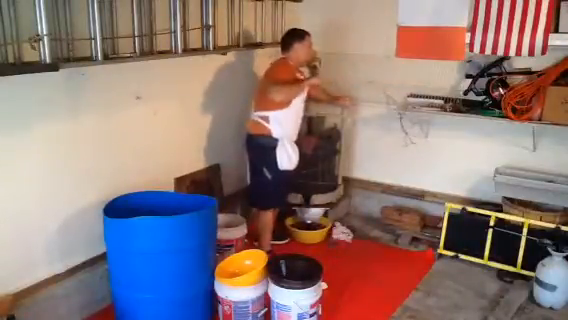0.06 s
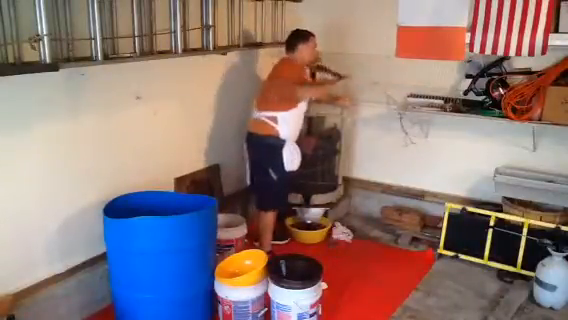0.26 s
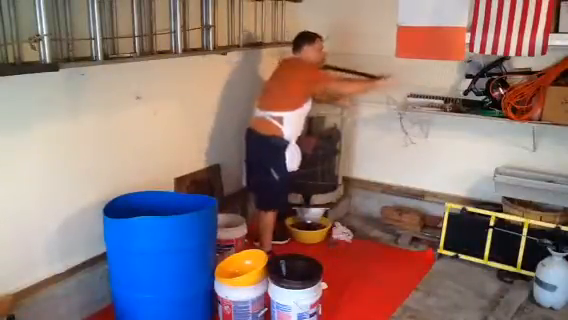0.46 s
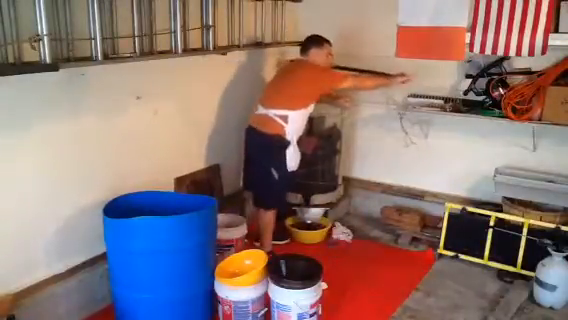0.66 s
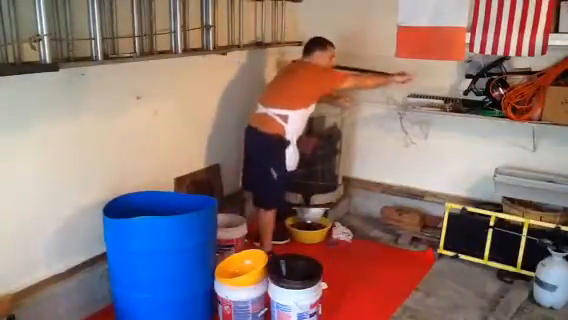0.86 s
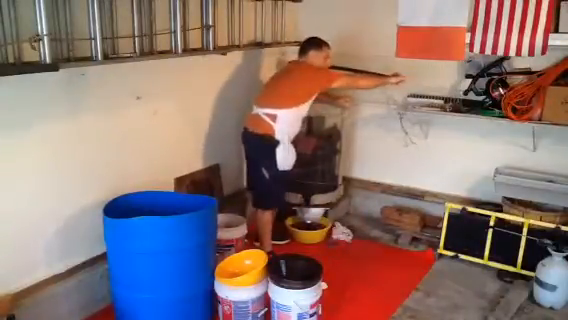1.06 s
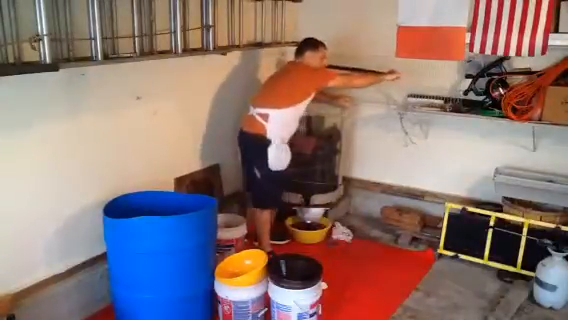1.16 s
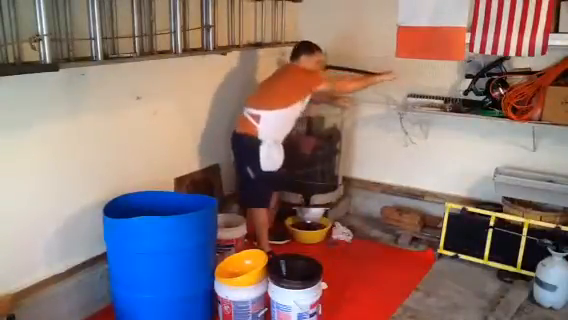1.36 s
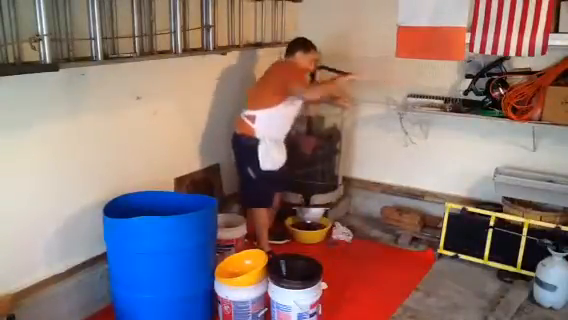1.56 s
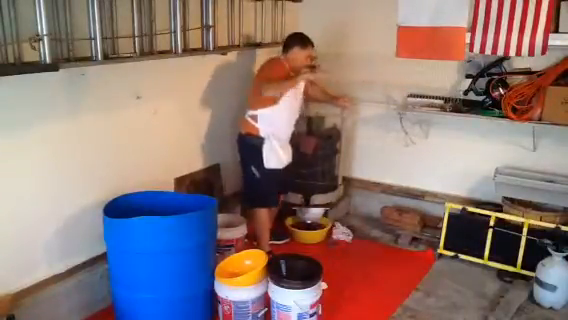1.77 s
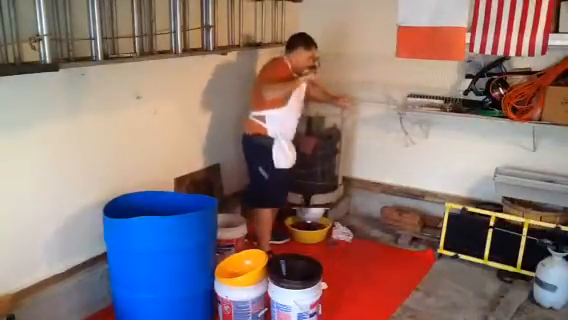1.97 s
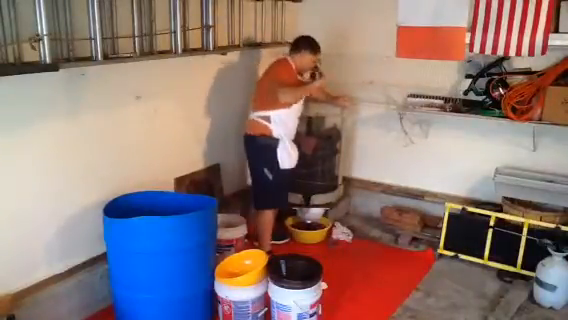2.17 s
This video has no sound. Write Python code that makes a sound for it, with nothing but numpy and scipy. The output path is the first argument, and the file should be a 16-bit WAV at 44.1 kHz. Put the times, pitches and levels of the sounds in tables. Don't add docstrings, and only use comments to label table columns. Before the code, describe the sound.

Hand-worked ratchet press: two bright metallic pawl clacks echo in a hard-walled garage, with faint knocks

```python
import sys
import numpy as np
from scipy import signal
from scipy.fft import rfft, irfft
from scipy.io import wavfile
from scipy.ndimage import uniform_filter1d

SR = 44100
rng = np.random.default_rng(int(sys.argv[2]) if len(sys.argv) > 2 else 0)


def voltage_ratio(level):
    return 10 ** (np.asarray(level, float) / 20)


def transcribe(u):
    v = np.clip(np.atleast_2d(u).T, -1, 1)
    q = np.round(v * 32767).astype(np.int16)
    wavfile.write(sys.argv[1], SR, q)


N = 97020

# (time [s], level [dB])
CLACKS = [
    (0.4174, -15),
    (0.6443, -13),
]
TOOTH_A_HZ = [900, 1040, 1077, 1120, 1151, 1296, 1814, 2653, 2721, 2921, 3027, 3308, 3523, 4368]
TOOTH_B_HZ = [937, 1042, 1123, 1301, 1689, 1770, 2643, 2921, 3006, 3082, 3174, 3256, 3312, 4760]
# (level [dB], t60 [s])
TOOTH_A_MODES = [(-4.5, 0.17), (5, .15), (6, 0.18), (6, 0.12), (1, 0.29), (-4, 0.22), (3, 0.12),
                 (5.5, 0.19), (2, 0.25), (0, 0.19), (6.5, 0.14), (1, 0.13), (-12, 0.12), (1, 0.096)]
TOOTH_B_MODES = [(2.5, 0.32), (3.5, 0.15), (7, 0.17), (-4, 0.18), (5, 0.18), (13.5, 0.18), (5.5, .14),
                 (-1, 0.17), (-9, .14), (-4, 0.2), (12, .15), (-5, .14), (-7, 0.28), (0, .12)]
# (frequency [Hz], density [dB per Hz])
CRACK_A = [(400, -22.5), (800, -13), (1080, -3), (2100, -12.5), (2950, -4), (5800, -12.5), (7200, -10),
           (15500, -29.5)]
CRACK_B = [(400, -22), (850, -15), (1400, -9), (1770, -7), (2250, -10.5), (2900, -3.5), (8990, -16),
           (15500, -30)]
# (delay [s], level [dB])
CHATTER = [(.0003, -22), (.0009, -19), (.0016, 4.5), (.0026, -9)]
# (time [s], level [dB])
TICK = [
    (1.7721, -34.5),
]
# (pitch [Hz], level [dB], t60 [s])
TICK_MODES = [(2456, 12, 0.049), (3370, 4, 0.034), (4060, -5, 0.015), (4870, -3, 0.025)]
# (frequency [Hz], density [dB per Hz])
TICK_CRACK = [(500, -19), (1500, -8), (2450, -4.5), (3000, -2.5), (4200, -1), (5200, -4.5), (6200, -10.5),
              (15500, -12.5)]
CRACK_A_DB, CRACK_B_DB, RATTLE_DB, RING_DB = 12.5, 12, 5.5, 2.5
RATTLE_DECAY_S, SLIP_S = 0.0047, 0.002

# (time [s], socket [dB], treble tilt [dB per octave], frame [dB])
JUDDERS = [
    [(.091, -46, -2, -49), (.099, -48.5, -9, -44), (.107, -48, -7, -54), (.115, -51, -7, -38),
     (.128, -47.5, -9, -51), (.137, -48, -5, -49)],
    [(1.1455, -48.5, -8, -72), (1.153, -46, -12, -55), (1.164, -53, -8, -53), (1.174, -54, -15, -56),
     (1.185, -47.5, -13, -57)],
    [(2.1008, -41.5, 4, -65), (2.104, -41.5, 4, -44), (2.110, -39, 2, -60), (2.118, -47, 9, -45.5),
     (2.126, -47, 0, -36), (2.136, -48, 3, -48), (2.142, -43, 7, -55), (2.148, -43, -5, -38),
     (2.153, -48, -3, -61)],
]
JUDDER_SCUFF_DB = (-54, -63.5, -53.5)
# (pitch [Hz], level [dB], t60 [s])
SOCKET_MODES = [(869, -15, 0.024), (1000, 3, 0.039), (1085, 1, 0.064), (1330, -12, 0.046),
                (1780, -6, 0.049), (2883, -0.5, 0.022), (3780, -11, 0.025)]
FRAME_MODES = [(163, -2, 0.064), (198, 6, 0.036), (276, -2, 0.025), (503, -0.5, 0.041)]
# (frequency [Hz], density [dB per Hz])
SCUFF = [(250, 4), (1000, 3), (1400, 2), (2500, -2), (4500, -10), (8000, -59), (15000, -33.5)]

# (time [s], level [dB])
THUMP = [
    (0.2087, -23),
]
# (pitch [Hz], level [dB], t60 [s])
BASKET_MODES = [(72, -5.5, 0.21), (100, -4, 0.17), (211, -10, 0.18), (279.3, -1, 0.15), (325.3, -6, 0.28),
                (363, 4.5, 0.089), (443, -6, 0.15), (505, -2.5, 0.12), (630, -11.5, 0.13),
                (730, -15.5, 0.13)]
THUMP_RISE_S = 0.0079

# (start [s], length [s], pitch [Hz], level [dB])
CREAKS = [(.155, 0.0513, 1470, -58), (0.315, 0.0576, 1590, -61.5), (.99, 0.0228, 2521, -63),
          (1.079, 0.018, 1780, -59), (1.086, 0.037, 3088, -62), (1.33, 0.1, 935, -57.5),
          (1.349, 0.027, 2630, -57.5), (1.417, .045, 3630, -60), (1.456, 0.0464, 1000, -64.5),
          (1.626, 0.059, 862, -54), (1.667, 0.036, 3034, -64), (1.7, 0.063, 910, -61),
          (1.788, 0.1326, 920, -61), (1.957, 0.0852, 945, -64.5), (1.8, 0.48, 1470, -70),
          (0.247, 0.0531, 1283, -57), (1.156, 0.041, 513, -54), (1.191, .07, 647, -63),
          (1.22, 0.0515, 524, -65), (0.573, 0.036, 330, -53.5), (0.339, 0.112, 697, -66)]
CREAK_WIDTH_HZ, CREAK_SLIPS_PER_S = 95, 400
# (start [s], length [s], level [dB])
SLIDES = [
    (0.304, 0.4, -59.5),
    (1.119, 0.31, -60),
    (1.5, 0.121, -72),
]
# (frequency [Hz], density [dB per Hz])
RUB = [(250, -1.5), (500, -21), (1500, -11.5), (4000, -12), (9000, -18), (15000, -26)]

# (frequency [Hz], t60 [s])
GARAGE_T60 = [(100, 0.87), (400, 0.71), (1000, 0.36), (3000, 0.33), (8000, 0.31), (14000, 0.21)]
# (delay [s], level [dB])
WALLS = [(.0029, 3), (.0053, -6), (.0075, 0.5), (0.0085, 1.5), (0.0122, -0.5), (0.016, -3.5), (0.023, -3)]
FIRST_ECHO_S, BUILD_S = 0.0023, 0.021
CRACK_WET_DB, TICK_WET_DB, RING_WET_DB = 17.5, 10, -4.5
JUDDER_WET_DB, THUMP_WET_DB, CREAK_WET_DB = -6.5, -13, -4
# (frequency [Hz], density [dB per Hz])
TONE = [(18, -58), (30, -30), (120, 3), (790, -10.5), (949, -8), (1870, -10.5), (2190, -13), (2500, -11.5),
        (15600, -25)]
TONE_DB = -56.5
# (pitch [Hz], width [Hz], level [dB])
ROOM_HUMS = [(141.4, 120, -86), (330, 21, -71.5)]

MIC_LIMIT, LOW_CUT_HZ, EDGE_HZ, PREAMP_DB = 0.24, 143, 15450, -70.5


def pawl(db, modes, crack, crack_db, rattle_db, slip_s, spread, wet_db, ring_db):
    bell = voltage_ratio(ring_db) * ring(modes)
    t = np.arange(len(bell)) / SR
    rise = np.minimum(t / slip_s, 1) ** 2
    rattle = voltage_ratio(rattle_db) * coloured(len(t), crack) * np.exp(-t / RATTLE_DECAY_S)
    touch = voltage_ratio(crack_db) * click(crack)
    snap = np.zeros(len(t))
    add(snap, slip_s, touch)
    chatter = np.zeros(len(t) + SR // 2 - 1)
    for k, (delay_s, touch_db) in enumerate(CHATTER):
        add(chatter[:len(t)], slip_s + spread * delay_s, (-1) ** k * voltage_ratio(touch_db) * touch)
    body = garage(rise * (bell + rattle), RING_WET_DB)
    return voltage_ratio(db) * (garage(snap, wet_db) + body + chatter)


def judder(blows, scuff_db):
    out = np.zeros(SR // 2)
    t = np.arange(len(out)) / SR
    frame = ring(FRAME_MODES)
    frame = frame * np.minimum(t[:len(frame)] / 0.0036, 1)
    bends = rng.uniform(0.92, 1.015, len(blows))
    for (s, db, treble_db, frame_db), bend in zip(blows, bends):
        socket = []
        for hz, mode_db, t60_s in SOCKET_MODES:
            tilt_db = treble_db * np.log2(max(hz / 1200, 1))
            socket.append((hz * bend, mode_db + tilt_db, t60_s))
        add(out, s - blows[0][0], voltage_ratio(db) * ring(socket) + voltage_ratio(frame_db) * frame)
    scuff = coloured(len(out), SCUFF) * np.exp(-(t / 0.045) ** 2)
    return garage(out + voltage_ratio(scuff_db) * scuff, JUDDER_WET_DB)


def thump(db):
    bell = ring(BASKET_MODES)
    rise = np.minimum(np.arange(len(bell)) / SR / THUMP_RISE_S, 1) ** 3
    return garage(voltage_ratio(db) * bell * rise, THUMP_WET_DB)


def creak(length_s, hz, db):
    shape = arch(length_s) ** 0.52
    slip_now = rng.random(SR // 2) < CREAK_SLIPS_PER_S / SR
    slips = rng.standard_normal(SR // 2) * (0.018 + slip_now)
    return voltage_ratio(db) * shape * resonate(slips[:len(shape)], hz, CREAK_WIDTH_HZ)


def slide(length_s, db):
    shape = arch(length_s)
    grit = voltage_ratio(0.82 * rng.exponential(1, SR // 2))
    rub = evened(coloured(SR // 2, RUB) * grit)
    return voltage_ratio(db) * shape * rub[:len(shape)]


def garage(x, wet_db):
    taps = np.zeros(SR // 2)
    at = np.arange(0, len(taps) - 20, 20)
    taps[at + rng.integers(0, 20, len(at))] = rng.choice([-1., 1.], len(at))
    hz, t, z = signal.stft(taps, SR, nperseg=256)
    t60_s = np.maximum(read(GARAGE_T60, hz), 0.05)[:, None]
    tail = signal.istft(z * voltage_ratio(-60 * t / t60_s), SR, nperseg=256)[1][:len(taps)]
    t = np.arange(len(tail)) / SR
    tail = tail * np.clip((t - FIRST_ECHO_S) / BUILD_S, 0, 1) ** 0.5
    tail = np.r_[1, voltage_ratio(wet_db) * tail[1:] / np.linalg.norm(tail)]
    places = rng.uniform(-1, 1, (len(WALLS), 2))
    for (delay_s, db), (shift, sign) in zip(WALLS, places):
        echo = np.sign(sign) * voltage_ratio(db + min(wet_db - 4.5, 0))
        tail[round((delay_s + 0.0004 * shift) * SR)] += echo
    return signal.fftconvolve(x, tail)


def room_tone():
    hz, t, z = signal.stft(coloured(N, TONE), SR, nperseg=1024, noverlap=768)
    patches = uniform_filter1d(rng.standard_normal(z.shape), 6, 0)
    patches = evened(uniform_filter1d(patches, 14, 1))
    depth_db = read([(200, 1.6), (1500, 0.23), (6000, 2.6)], hz)[:, None]
    hiss = signal.istft(z * voltage_ratio(depth_db * patches), SR, nperseg=1024, noverlap=768)[1][:N]
    out = voltage_ratio(TONE_DB) * evened(hiss)
    for hum_hz, width_hz, db in ROOM_HUMS:
        out = out + voltage_ratio(db) * resonate(rng.standard_normal(N), hum_hz, width_hz)
    return out


def ring(modes):
    t = np.arange(SR // 4) / SR
    out = np.zeros(len(t))
    for hz, db, t60_s in modes:
        out += voltage_ratio(db - 60 * t / max(t60_s, 0.005)) * np.sin(2 * np.pi * hz * t)
    return out / np.sqrt(sum(voltage_ratio(db) ** 2 for _, db, _ in modes))


def click(points):
    hz = abs(np.fft.fftfreq(2048, 1 / SR))
    skirt = np.clip(hz / points[0][0], 0.001, 1) ** 2
    log_gain = np.log(voltage_ratio(read(points, hz)) * skirt)
    out = np.fft.ifft(np.exp(np.conj(signal.hilbert(log_gain)))).real[:1024]
    return out / np.linalg.norm(out)


def coloured(count, points):
    hz = np.fft.rfftfreq(count, 1 / SR)
    skirt = np.minimum(hz / points[0][0], 1) ** 2
    spectrum = rfft(rng.standard_normal(count)) * voltage_ratio(read(points, hz)) * skirt
    return evened(irfft(spectrum, count))


def resonate(x, hz, width_hz):
    r = np.exp(-np.pi * width_hz / SR)
    return evened(signal.lfilter([1, 0, -1], [1, -2 * r * np.cos(2 * np.pi * hz / SR), r * r], x))


def arch(length_s):
    return np.sin(np.pi * np.arange(0, length_s, 1 / SR) / length_s)


def read(points, hz):
    f, value = np.transpose(points)
    return np.interp(np.log(hz + 1), np.log(f + 1), value)


def evened(x):
    return x / np.sqrt(np.mean(x ** 2) + 1e-20)


def add(mix, s, sound):
    part = mix[round(s * SR):][:len(sound)]
    part += sound[:len(part)]


def scene():
    mix, faint = room_tone(), np.zeros(N)
    teeth = [(TOOTH_A_HZ, TOOTH_A_MODES, CRACK_A, CRACK_A_DB),
             (TOOTH_B_HZ, TOOTH_B_MODES, CRACK_B, CRACK_B_DB)]
    for (s, db), (pitches, shares, crack, crack_db) in zip(CLACKS, teeth):
        modes = [(hz, *share) for hz, share in zip(pitches, shares)]
        add(mix, s, pawl(db - 12.5, modes, crack, crack_db, RATTLE_DB, SLIP_S, spread=1.1,
                         wet_db=CRACK_WET_DB, ring_db=RING_DB))
    for s, db in TICK:
        add(mix, s, pawl(db - 14, TICK_MODES, TICK_CRACK, crack_db=19.9, rattle_db=5.4, slip_s=0.0006,
                         spread=0.34, wet_db=TICK_WET_DB, ring_db=-0.55))
    for blows, scuff_db in zip(JUDDERS, JUDDER_SCUFF_DB):
        add(mix, blows[0][0], judder(blows, scuff_db))
    for s, db in THUMP:
        add(mix, s, thump(db + 2))
    for s, length_s, hz, db in CREAKS:
        add(faint, s, creak(length_s, hz, db))
    for s, length_s, db in SLIDES:
        add(faint, s, slide(length_s, db))
    return (mix + voltage_ratio(-4.0) * garage(faint, CREAK_WET_DB)[:N])[None]


def low_pass(x):
    return signal.sosfilt(signal.butter(12, 15960, fs=SR, output="sos"), x)


def record(dry):
    limited = MIC_LIMIT * np.tanh(dry / MIC_LIMIT)
    bass_cut = signal.butter(2, LOW_CUT_HZ, "high", fs=SR, output="sos")
    x = signal.sosfilt(bass_cut, limited)
    x = x + voltage_ratio(PREAMP_DB) * rng.standard_normal(x.shape)
    band_limit = signal.firwin(1023, EDGE_HZ, window=("kaiser", 9), fs=SR)
    x = signal.oaconvolve(x, band_limit[None], "same")
    return low_pass(x)


dry = scene()
out = record(dry)
transcribe(out)
```